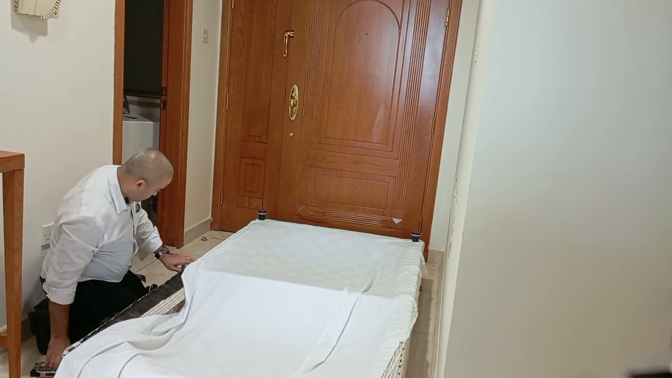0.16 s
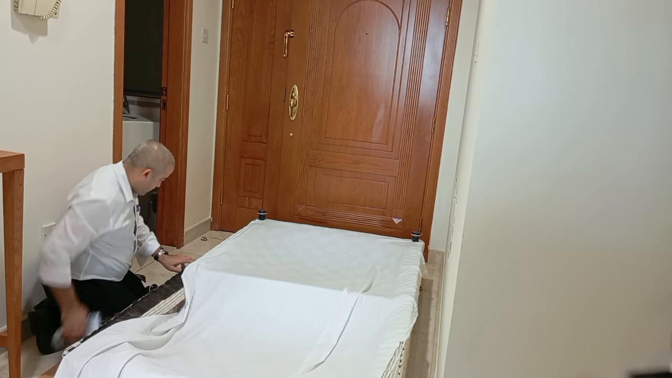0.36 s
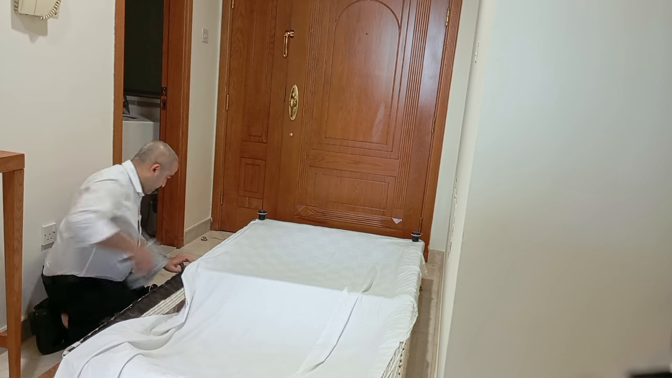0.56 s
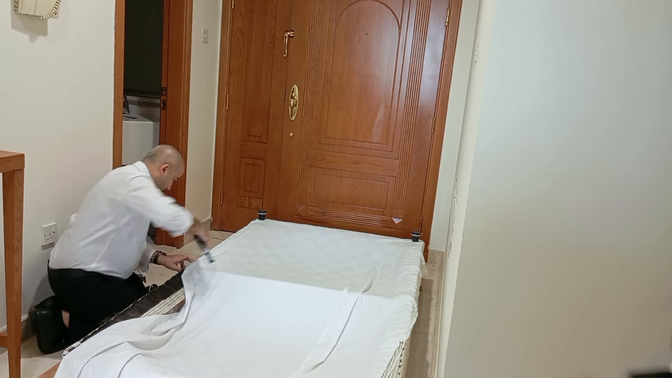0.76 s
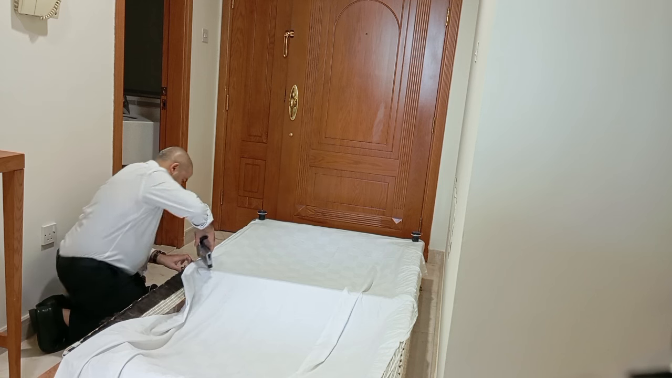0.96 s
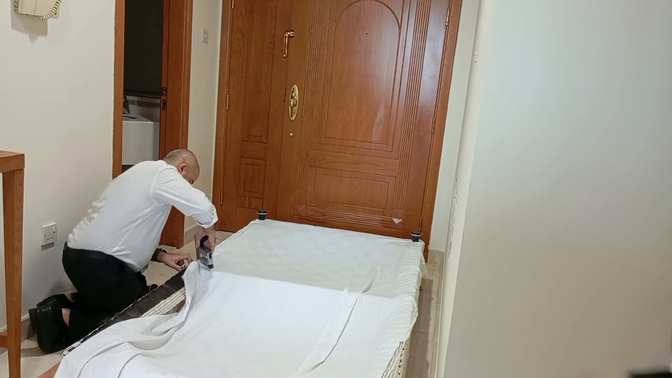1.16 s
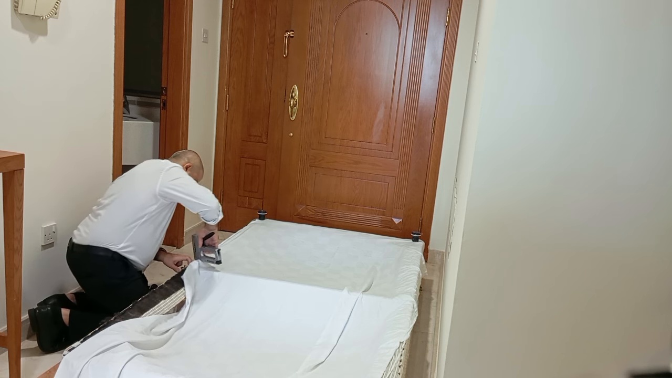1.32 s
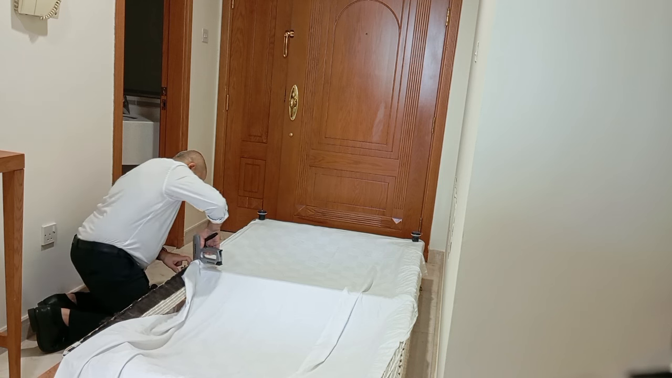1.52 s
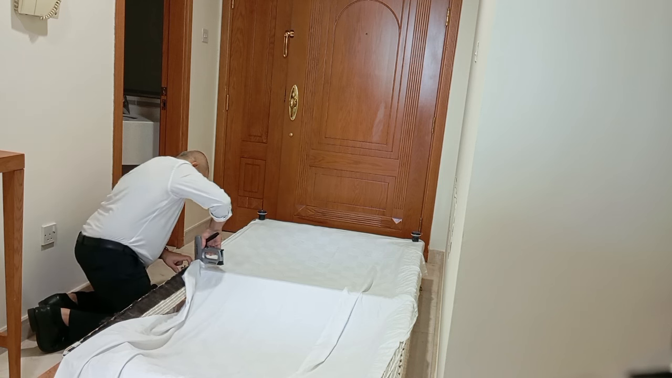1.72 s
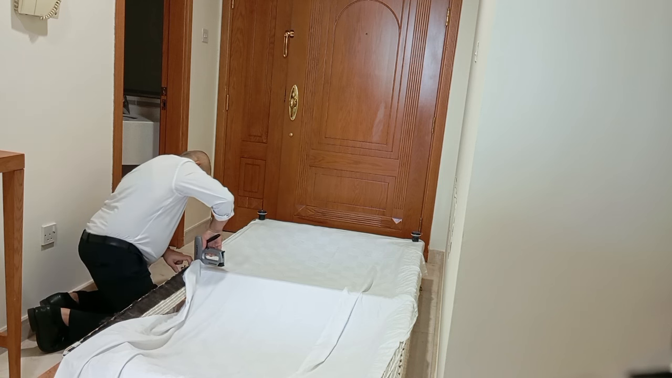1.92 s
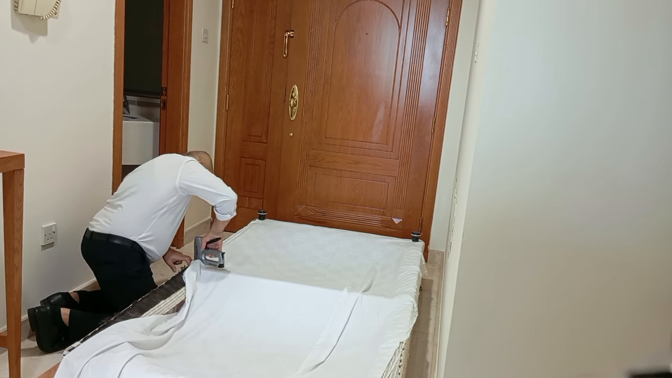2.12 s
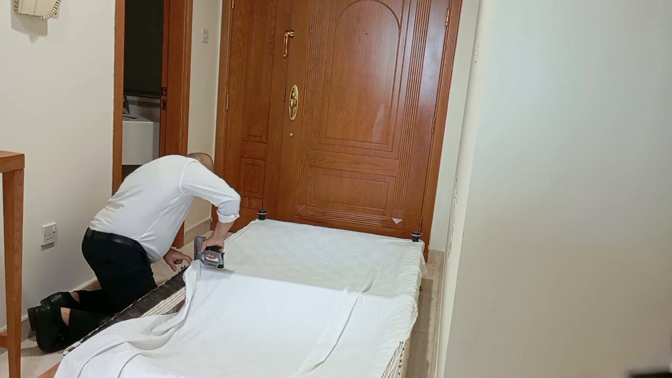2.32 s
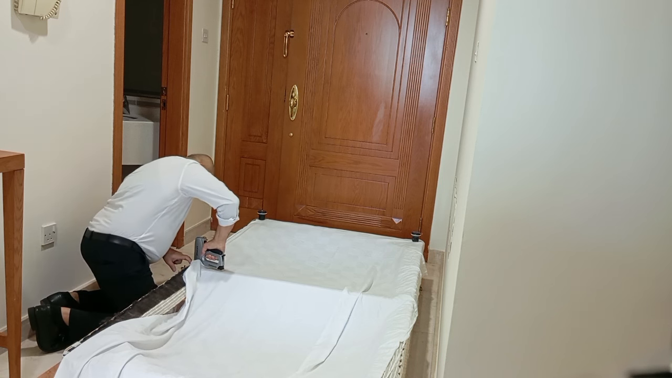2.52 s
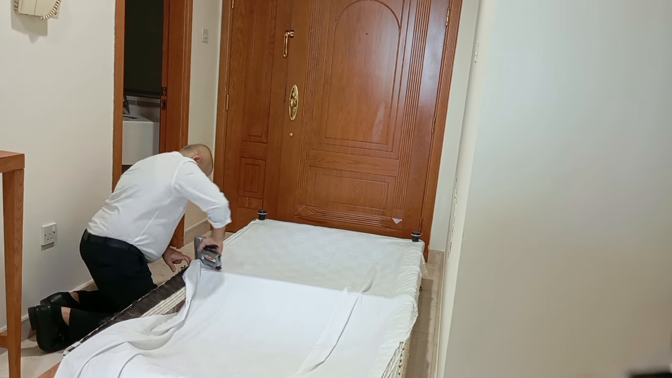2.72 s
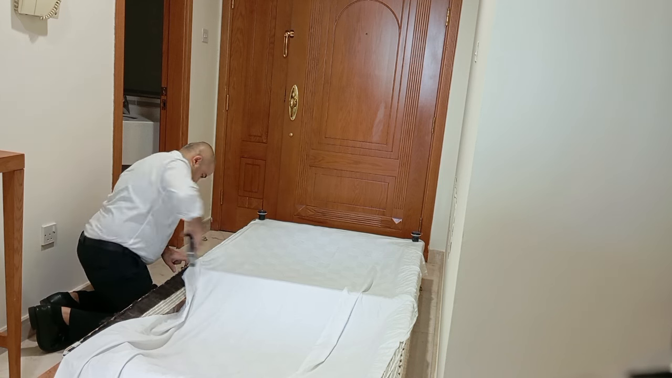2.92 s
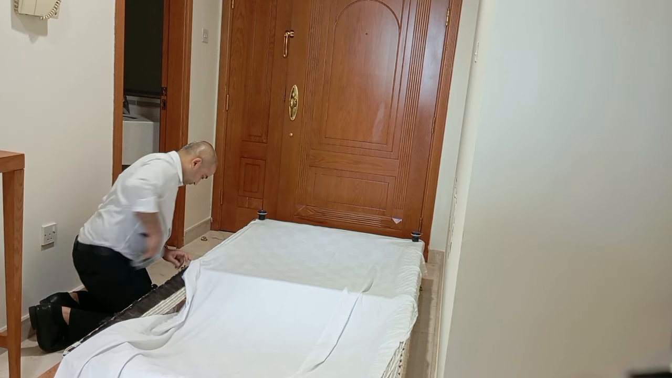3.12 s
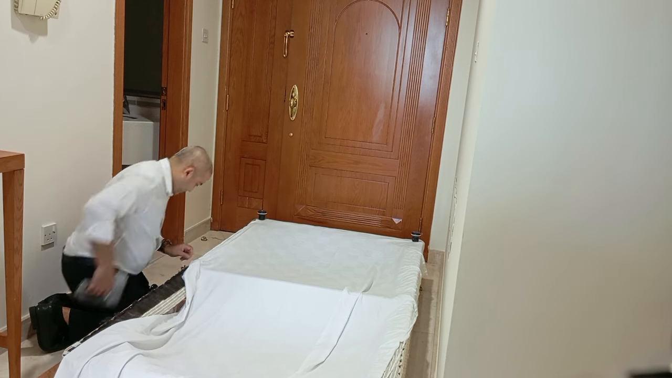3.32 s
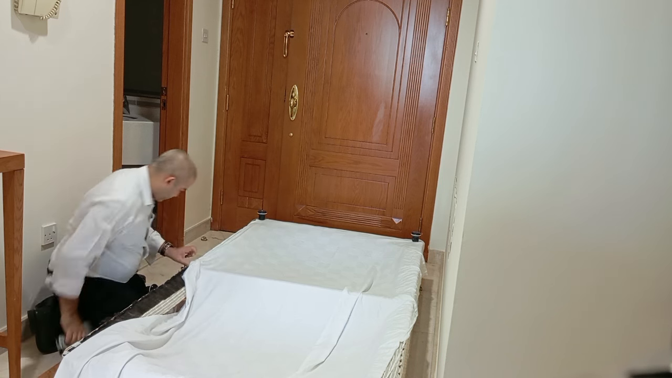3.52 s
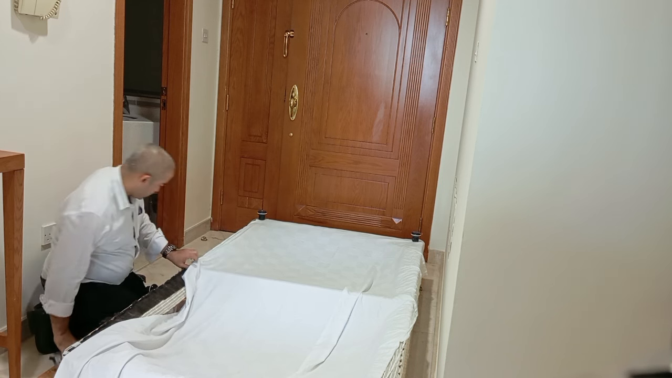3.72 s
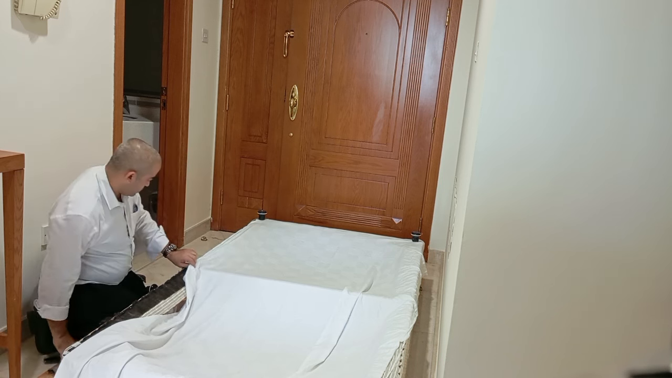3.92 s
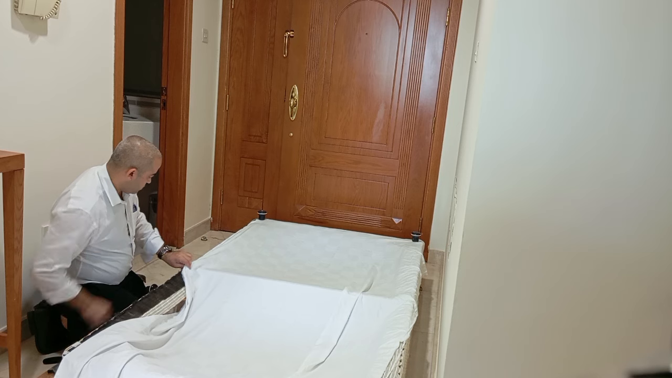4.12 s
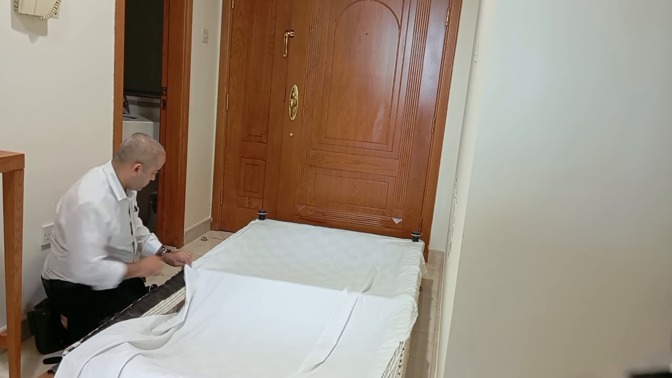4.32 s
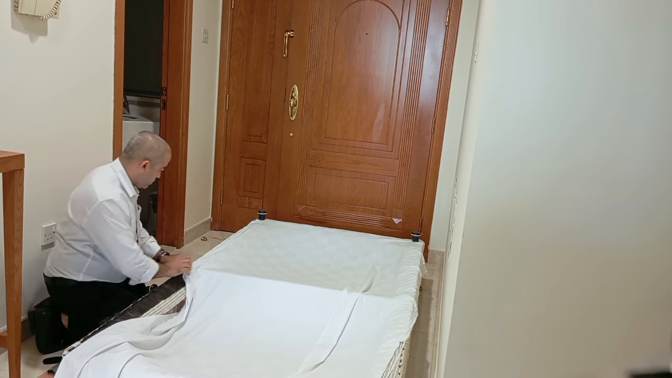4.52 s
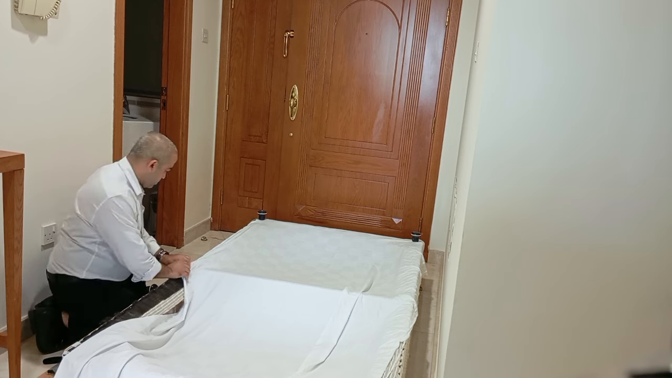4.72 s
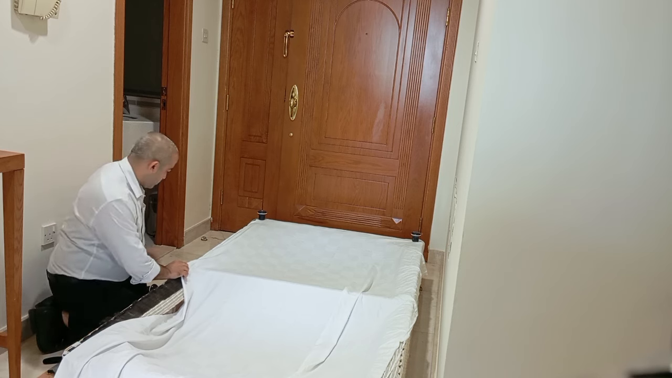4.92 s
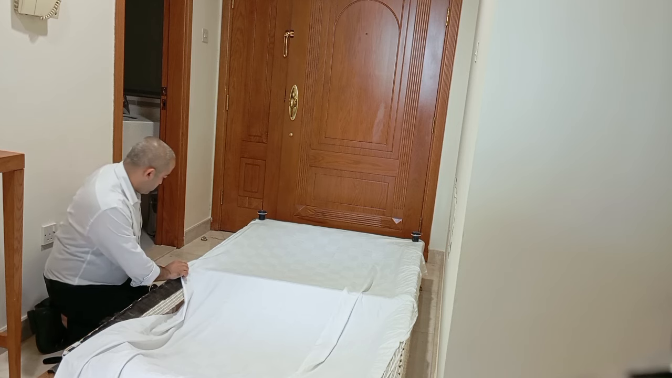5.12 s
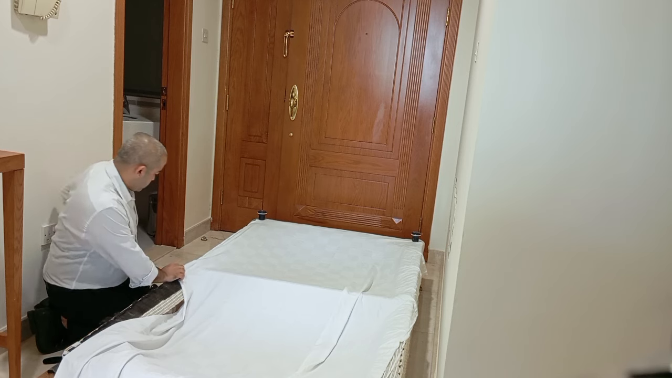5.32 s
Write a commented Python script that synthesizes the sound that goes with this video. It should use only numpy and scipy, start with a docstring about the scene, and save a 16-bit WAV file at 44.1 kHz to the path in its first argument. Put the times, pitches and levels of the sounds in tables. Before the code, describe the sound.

A quiet hard-walled room with a low drone. A steel staple gun scrapes lightly off tile, knocks dully on a wooden frame, then fires one loud snapping shot with a low thump. Lever clicks follow, then two metal taps and a hard landing on the floor. Distant single microphone, echoing and slightly overloaded.

```python
"""A steel staple gun fires once into a wooden bed frame, after being picked off a tiled floor; then it is laid down.
Each clack is shaped noise: a weak, dull direct sound behind the worker's body, a brighter slap
off the walls, then a hard room's tail. Resonance tables give the steel, wood and tile their ring.
Cloth rustles faintly over a low room drone and hum, made from filtered noise.
The shot overloads the microphone with a low thump; the recorder's limiter ducks the loudest blows."""
import sys
import numpy as np
from scipy import signal
from scipy.fft import rfft, irfft
from scipy.io import wavfile
from scipy.ndimage import uniform_filter1d

SR = 44100
rng = np.random.default_rng(int(sys.argv[2]) if len(sys.argv) > 2 else 0)


def to_wav(sig):
    """Store sig (one row per channel, or 1-D mono) as 16-bit WAV at the path in sys.argv[1].

    Samples outside -1..1 are clipped; the rate is SR.
    """
    pcm = np.clip(np.atleast_2d(sig), -1, 1) * 32767
    pcm = np.round(pcm).astype(np.int16)
    wavfile.write(sys.argv[1], SR, pcm.T)  # frames by channels


N = 236180
TIME = np.arange(N) / SR
RING = TIME[:SR]  # each blow is given one second to ring
FFT_SIZE = 2 ** 17
HZ = np.maximum(np.arange(FFT_SIZE // 2 + 1) * SR / FFT_SIZE, 1)

# the gun is seated on the frame, fired, dropped on the floor (t/s)
SEAT_S, SHOT_S, DROP_S = 1.0995, 2.5065, 4.0577


def from_db(db):
    """Turn decibels into a gain."""
    return 10 ** (np.asarray(db) / 20)


def at_hz(points, hz):
    """Read a table between its points, on a log-frequency axis."""
    table_hz, value = np.transpose(points)
    return np.interp(np.log(hz), np.log(table_hz), value)


def lifts(peaks, hz):
    """Add up resonance humps in dB; a negative lift is a dip."""
    return sum(db / (1 + (2 * (hz - centre) / width) ** 2) for centre, width, db in peaks)


def dying(t60):
    """Exponential decay that loses 60 dB in t60 seconds."""
    return np.exp(-np.log(1000) * RING / t60)


def add(track, s, sound):
    """Mix a sound in at a given time."""
    part = track[max(round(s * SR), 0):][:len(sound)]
    part += sound[:len(part)]


def noise(spectrum, peaks=()):
    """Steady coloured noise with an rms of 1."""
    hz = np.maximum(np.arange(N // 2 + 1) * SR / N, 1)
    colour_db = at_hz(spectrum, hz) + lifts(peaks, hz)
    coloured = irfft(rfft(rng.standard_normal(N)) * from_db(colour_db), N)
    return coloured / coloured.std()


def wander(rate_hz):
    """Slow random motion with a spread of 1: noise with its fast part removed."""
    hz = np.arange(N // 2 + 1) * SR / N
    slow = (hz > 0) * np.exp(-(hz / rate_hz) ** 2)
    motion = irfft(rfft(rng.standard_normal(N)) * slow, N)
    return motion / motion.std()


# colour of the room drone before it is set to its level: [f/Hz, level/dB per Hz]
DRONE_COLOUR = [(15, -84), (25, -56), (59, -10.5), (108, -10), (145, -1.5), (175, -6), (242, -6),
                (373, -13.5), (677, -12.5), (988, -18), (1070, -18.5), (1290, -25), (6560, -45.5),
                (9070, -50), (16000, -56.5)]
# resonances in the drone: [f/Hz, width/Hz, lift/dB]
DRONE_RESONANCES = [(78, 13, 8.5), (149.9, 20, -4), (246.8, 17, 4), (898.5, 290, 0), (9200, 890, 6.5)]


def drone(level_db=-55.5):
    """Steady room noise, mostly low, with a few resonances."""
    return from_db(level_db) * noise(DRONE_COLOUR, DRONE_RESONANCES)


# narrow band of low sound shared by the hum and the boom: [f/Hz, level/dB]
HUM_COLOUR = [(90, -41.5), (140, 3), (195, -3), (250, -5), (330, -49)]
# resonances in that band: [f/Hz, width/Hz, lift/dB]
HUM_RESONANCES = [(142.9, 12, 13.5), (196.2, 15, 6.5)]


def hum(level_db=-62.5, spread_db=3.5, wander_hz=2.1):
    """Low-band noise that wanders in level and swells once."""
    swell_s, hold_s, swell_db = 1.31, .1, -52.5
    attack_s, release_s = .04, .025  # the rise ends at swell_s; the fall follows the hold
    rise = (TIME - swell_s) / attack_s
    fall = (swell_s + hold_s - TIME) / release_s
    swell = from_db(swell_db) * np.clip(1 + np.minimum(rise, fall), 0, 1)
    wandering = from_db(level_db + spread_db * wander(wander_hz))
    return np.maximum(wandering, swell) * noise(HUM_COLOUR, HUM_RESONANCES)


def boom(level_db=-50, rise_s=.07):
    """The low band builds and dies after the knock on the frame."""
    age = np.maximum(TIME - SEAT_S, 0) / rise_s
    swell = age ** 2 * np.exp(1 - age ** 2)
    return from_db(level_db) * swell * noise(HUM_COLOUR, HUM_RESONANCES)


# cloth being smoothed: [t/s, half length/s, level/dB]
RUBS = [(0.235, 0.017, -76), (2.103, 0.04, -70.5), (5.115, 0.026, -75), (5.337, 0.12, -74)]
# colour of rubbing fabric: [f/Hz, level/dB]
CLOTH_COLOUR = [(300, -6), (2500, 6.5), (6000, -7), (9300, -0.5), (12000, -15), (16000, -34)]


def cloth():
    """Rubbing fabric: coloured noise that swells and fades in soft bell shapes."""
    swells = sum(from_db(db) * np.exp(-((TIME - s) / half) ** 2 / 2) for s, half, db in RUBS)
    return noise(CLOTH_COLOUR) * swells


# how long the room rings in each band: [f/Hz, time to fall 60 dB/s]
ROOM_DECAY = [(100, 0.37), (300, 0.56), (1000, 0.66), (2700, 0.7), (5000, 0.67), (9000, 0.48),
              (15000, 0.34)]


def room_tail():
    """Diffuse reflections: noise in which each band dies at its own rate."""
    white = rfft(rng.standard_normal(SR))
    hz = np.maximum(np.arange(SR // 2 + 1), 1)
    centres = np.log(np.array(ROOM_DECAY)[:, 0])
    tail = np.zeros(SR)
    for one_band, (_, t60) in zip(np.eye(len(centres)), ROOM_DECAY):
        share = np.interp(np.log(hz), centres, one_band)
        tail += irfft(white * share, SR) * dying(t60)
    return tail


# standing waves of the room: [f/Hz, level/dB, time to fall 60 dB/s]
STANDING_WAVES = [(140, -37, .8), (271, -27.5, 0.576), (326.6, -27, .65)]


def room_path(slap_db, direct_db):
    """Way to the microphone: dull screened arrival, slap off the corner walls, early reflections, tail."""
    screen_hz, direct_t60 = 3500, 0.039
    slap_s, slap_width_s, mirror_db = .0108, 0.0023, 16
    early_db, early_t60, tail_db, build_s = 2.0, 0.22, -1.0, 0.0045
    direct, slap, early = rng.standard_normal((3, SR))
    screen = signal.butter(1, screen_hz, fs=SR, output="sos")
    direct = signal.sosfilt(screen, direct * dying(direct_t60))
    slap = slap * np.exp(-((RING - slap_s) / slap_width_s) ** 2 / 2)
    slap[round(slap_s * SR)] += from_db(mirror_db)  # the flat wall returns one clean copy
    clumps = np.sqrt(rng.exponential(1, SR // 32 + 1)).repeat(32)[:SR]  # uneven early reflections
    early = early * clumps * dying(early_t60)
    diffuse = from_db(early_db) * early + from_db(tail_db) * room_tail()
    diffuse = diffuse * (1 - np.exp(-RING / build_s))
    standing = sum(from_db(db) * np.sin(2 * np.pi * hz * RING) * dying(t60)
                   for hz, db, t60 in STANDING_WAVES)
    return from_db(direct_db) * direct + from_db(slap_db) * slap + diffuse + standing


def through_body(x, colour_db):
    """Minimum-phase filter: resonances ring after the blow, never before it."""
    cepstrum = irfft(np.log(from_db(colour_db)))
    cepstrum[1:FFT_SIZE // 2] *= 2  # fold the half before time zero onto the half after it
    cepstrum[FFT_SIZE // 2 + 1:] = 0
    return irfft(rfft(x, FFT_SIZE) * np.exp(rfft(cepstrum)))[:len(x)]


# resonances of the gun's steel casing: [f/Hz, width/Hz, lift/dB]
CASING_RING = [(830, 32, 2.5), (1049, 89, 0.5), (1713, 100, 0), (2060, 60, 3.5), (2550, 68, 2.5),
               (3700, 100, 3), (5050, 91, 2), (7670, 90, -5), (8200, 100, 1.5), (8860, 230, 2),
               (9200, 150, 3), (10280, 270, 1.5)]


def blow(colour_db, slap_db, loose_db, direct_db, chatter_s=.024, count=6):
    """One contact and the chatter of loose parts after it ring the casing and the room."""
    delay = (np.arange(count) + rng.uniform(.2, 1, count)) / count
    size = rng.choice([-1, 1], count) * np.exp(-delay)
    force = np.zeros(SR)
    force[(delay * chatter_s * SR).astype(int)] = from_db(loose_db) * size / np.linalg.norm(size)
    force[0] = 1
    in_room = signal.fftconvolve(force, room_path(slap_db, direct_db))[:SR]
    return through_body(in_room, colour_db + lifts(CASING_RING, HZ))


# colour of a light steel contact: [f/Hz, level/dB]
LIGHT_COLOUR = [(60, -21.5), (130, -10), (280, -3), (500, -4.5), (700, -3.5), (950, -3.5), (1400, 1),
                (2000, -2), (3000, -7), (4600, -12.5), (7000, -13.5), (9300, -11.5), (12000, -20.5),
                (16000, -25)]
# resonances of the lever: [f/Hz, width/Hz, lift/dB]
LEVER_RING = [(891, 120, 8.5), (1020, 220, 7), (1349, 250, -3), (1920, 150, 4.5), (2495, 370, -4.5)]
# resonances of the gun's nose: [f/Hz, width/Hz, lift/dB]
NOSE_RING = [(1050, 460, 7.5), (1322, 100, 4.5), (1960, 380, -5.5)]


def contact_colour(bass_db, treble_db, lever, nose=0):
    """Colour of a light contact in dB: bass and treble shelves, plus shares of lever and nose ring."""
    bass_hz, treble_hz = 650, 3200  # where the shelves begin
    low = 1 / (1 + (HZ / bass_hz) ** 4)
    high = 1 / (1 + (treble_hz / HZ) ** 2)
    ring_db = lever * lifts(LEVER_RING, HZ) + nose * lifts(NOSE_RING, HZ)
    return at_hz(LIGHT_COLOUR, HZ) + bass_db * low + treble_db * high + ring_db


# the gun touches the tiles, three times as it is picked up and twice as it is laid down:
# [t/s, level/dB, brightness/dB, share of lever ring, share of nose ring]
TOUCHES = [ (0.014, -50, -7, .9, 1.26), (0.287, -40, -1.5, .35, 0.87), (0.405, -39, 1.5, .6, 1.15),
           (3.777, -19.5, 1.5, .05, 0.39), (3.954, -20.5, 0, .55, .05)]


def tile_touches(slap_db=6.0, loose_db=-6.5, direct_db=4.5):
    """Steel meets tile: a brighter touch has less bass; lever and nose ring by where the gun is hit."""
    bass_per_brightness = -2.2  # dB per dB
    out = np.zeros(N)
    for s, db, bright_db, lever, nose in TOUCHES:
        colour_db = contact_colour(bass_per_brightness * bright_db, bright_db, lever, nose)
        add(out, s, blow(db + colour_db, slap_db, loose_db, direct_db))
    return out


# the lever clicks as it is gripped, squeezed and let go:
# [t/s, level/dB, treble/dB, pressure on the frame 0-1]
CLICKS = [ (0.987, -58.5, 6.5, .35), (2.375, -64, 23, 0.7), (2.473, -42, 10.5, .9), (2.878, -39.5, 7, 0.1),
          (3.034, -32, 8, 0)]
# at full pressure the spring sings and the top is muffled: [f/Hz, width/Hz, lift/dB]
PRESSED_RING = [(9300, 1500, 4), (14530, 5500, -9.5)]


def lever_clicks(slap_db=5.5, loose_db=-8.5, direct_db=6.0):
    """Steel on steel: pressing down damps the lever's ring and brings out the bass of the wooden frame."""
    free_bass_db, pressed_bass_db = -12.5, 15  # gun held free, and pressed hard on the wood
    free_ring = 1.2  # share of lever ring with a loose hand
    out = np.zeros(N)
    for s, db, treble_db, pressure in CLICKS:
        bass_db = free_bass_db + pressure * (pressed_bass_db - free_bass_db)
        lever = free_ring * np.clip(1 - pressure, 0, 1)
        colour_db = contact_colour(bass_db, treble_db, lever) + pressure * lifts(PRESSED_RING, HZ)
        add(out, s, blow(db + colour_db, slap_db, loose_db, direct_db))
    return out


# colour of the knock on wood: [f/Hz, level/dB]
WOOD_KNOCK = [(60, -9), (140, -11), (270, 2), (540, 1.5), (1000, -4), (1450, -5), (2100, -9), (2900, -21.5),
              (3900, -22.5), (4500, -26.5), (7600, -29.5), (9200, -22), (12000, -37), (16000, -40)]


def seat(level_db=-26.5, slap_db=5.0, loose_db=-8.0, direct_db=1.0):
    """The nose is set on the fabric-covered frame: a dull wooden knock with a thin jingle of steel."""
    out = np.zeros(N)
    add(out, SEAT_S, blow(at_hz(WOOD_KNOCK, HZ) + level_db, slap_db, loose_db, direct_db))
    return out


# colour of the gun landing on the floor: [f/Hz, level/dB]
LANDING_COLOUR = [(60, -21.5), (170, -13.5), (300, -1.5), (450, -5), (800, -2), (1050, -1), (1250, -5.5),
                  (1800, -4), (3600, -10), (4600, -12.5), (7000, -10.5), (9200, -5.5), (12000, -17.5),
                  (16000, -22.5)]
# resonances of the gun lying on tile: [f/Hz, width/Hz, lift/dB]
LANDING_RING = [(251.7, 23, 7.5), (328, 29, 2.5), (1004, 230, 6), (1200, 100, -7.5), (2150, 57, 3),
                (2340, 130, -6), (3930, 360, 4.5), (4450, 300, -9), (9350, 380, 1)]


def drop(level_db=-7.0, slap_db=4.0, loose_db=-21.5, direct_db=0.5):
    """The gun tips over and lands flat on the tiles: one hard blow that rings steel and floor."""
    out = np.zeros(N)
    colour_db = at_hz(LANDING_COLOUR, HZ) + level_db + lifts(LANDING_RING, HZ)
    add(out, DROP_S, blow(colour_db, slap_db, loose_db, direct_db))
    return out


def overload_thump(after_s=.015, width_s=0.0015, level_db=-12.0):
    """The shot overloads the microphone: one short, dry low thump just after it."""
    u = (TIME - SHOT_S - after_s) / width_s / 2
    return from_db(level_db) * (1 - 2 * u ** 2) * np.exp(-u ** 2)


# colour of the shot: [f/Hz, level/dB]
FIRING_COLOUR = [(60, -21.5), (150, -11.5), (280, 2.5), (420, -2.5), (680, -8), (850, 0), (1500, -0.5),
                 (2700, 0), (4400, -6), (7000, -8), (9400, -1), (12000, -12), (16000, -16)]
# resonances of the wooden frame and the gun's spring: [f/Hz, width/Hz, lift/dB]
FIRING_RING = [(257, 17, 6.5), (384, 31, -17), (514.3, 160, 7), (1025, 62, -7), (1747, 55, 6),
               (1840, 30, -3), (2180, 66, -7.5), (2200, 33, 5.5), (2710, 60, 2), (2935, 50, 1.5),
               (3150, 92, 4), (3370, 130, -4.5), (4514, 190, -7), (5095, 140, 3.5)]


def shot(level_db=-1.5, latch_db=-17.5, flight_s=.0022, slap_db=-2.0, loose_db=-14.0, direct_db=-4.5):
    """The latch lets go; a moment later the spring-thrown driver sinks the staple into the wooden frame."""
    out = np.zeros(N)
    colour_db = at_hz(FIRING_COLOUR, HZ) + lifts(FIRING_RING, HZ)
    add(out, SHOT_S, blow(colour_db + latch_db, slap_db, loose_db, direct_db + 3))
    add(out, SHOT_S + flight_s, blow(colour_db + level_db, slap_db, loose_db, direct_db))
    return out


def scene():
    """Mix all sources into one channel."""
    background = drone() + hum() + boom() + cloth()
    gun = tile_touches() + lever_clicks() + seat() + drop() + overload_thump() + shot()
    return (background + gun)[None]


def limiter(x, ceiling_db=-16.5, release_db_per_s=75):
    """The gain falls at once when the short-term level passes the ceiling, then creeps back."""
    power = uniform_filter1d(x ** 2, size=128)
    level_db = 10 * np.log10(np.maximum(power, 1e-12))
    excess_db = np.maximum(level_db - ceiling_db, 0)
    recovery = release_db_per_s * TIME
    # a running maximum on a rising ramp holds each cut while it shrinks steadily
    cut_db = np.maximum.accumulate(excess_db + recovery, axis=-1) - recovery
    return x * from_db(-uniform_filter1d(cut_db, size=48))


def record(dry, low_hz=38, cutoff_hz=16200):
    """The microphone loses the deepest bass; then the limiter and a steep top cut."""
    bass_cut = signal.butter(2, low_hz, "high", fs=SR, output="sos")
    top_cut = signal.ellip(10, .1, 80, cutoff_hz, fs=SR, output="sos")
    heard = signal.sosfilt(bass_cut, dry)
    return signal.sosfilt(top_cut, limiter(heard))


dry = scene()
out = record(dry)
to_wav(out)
```